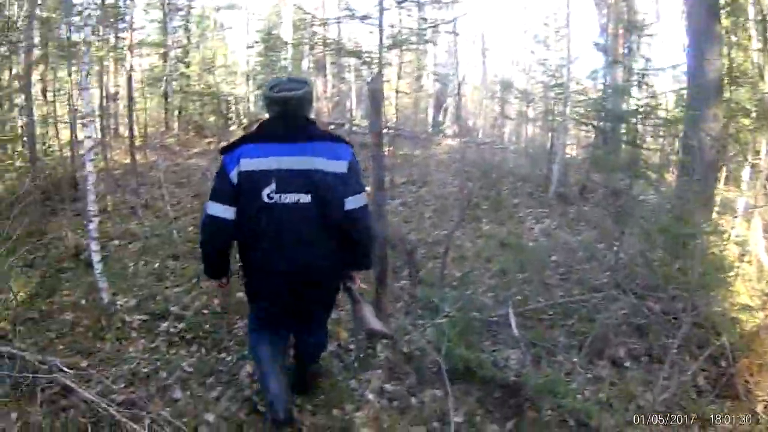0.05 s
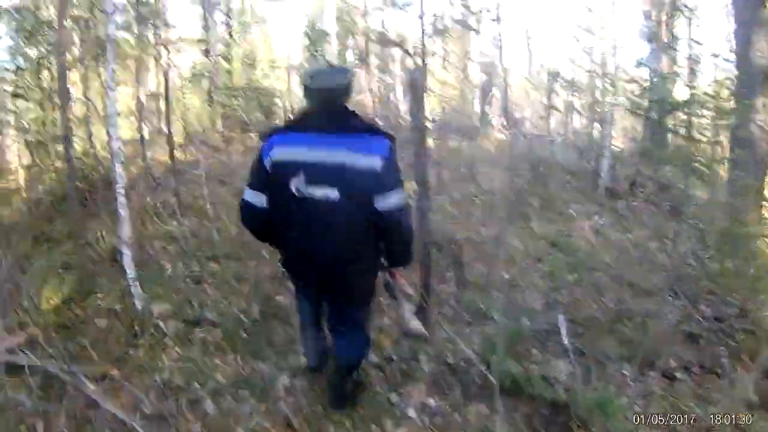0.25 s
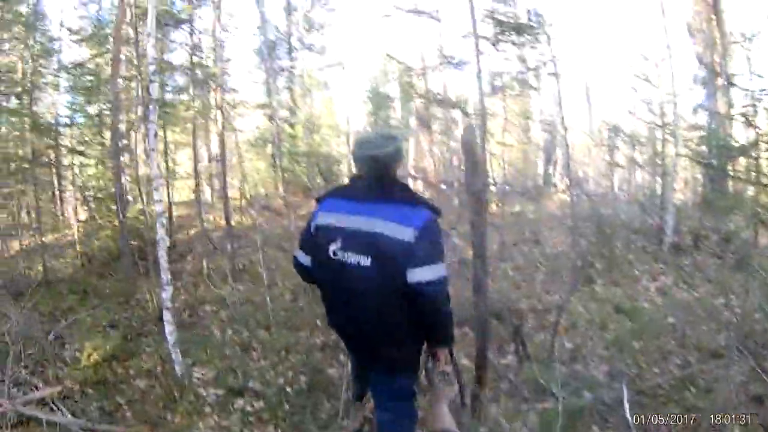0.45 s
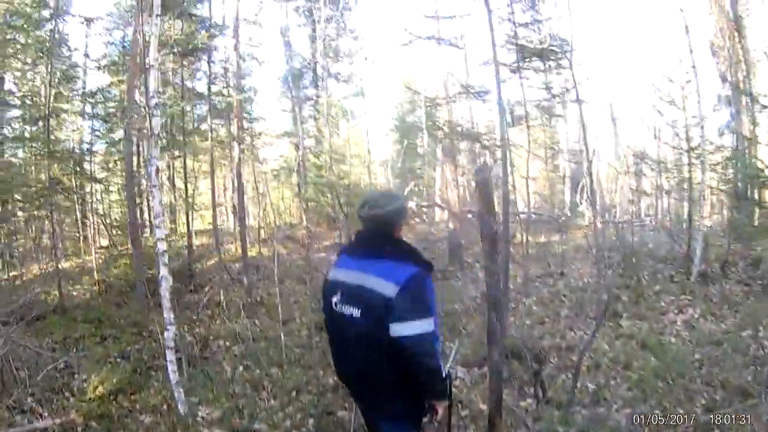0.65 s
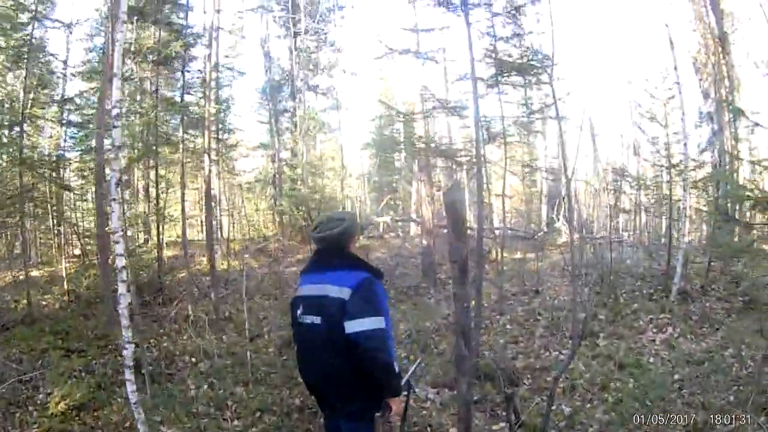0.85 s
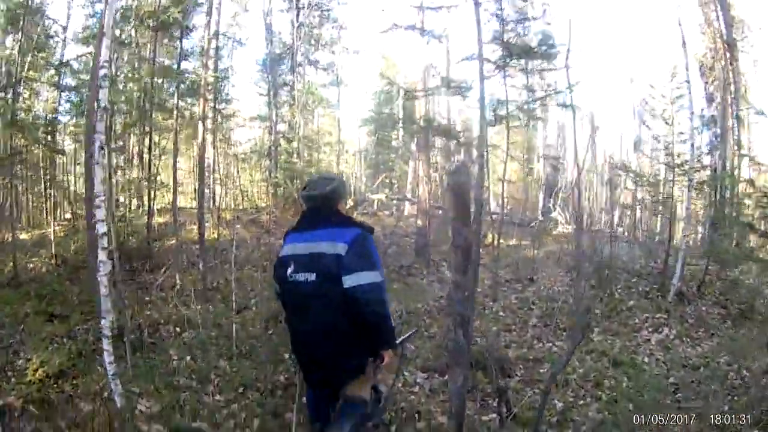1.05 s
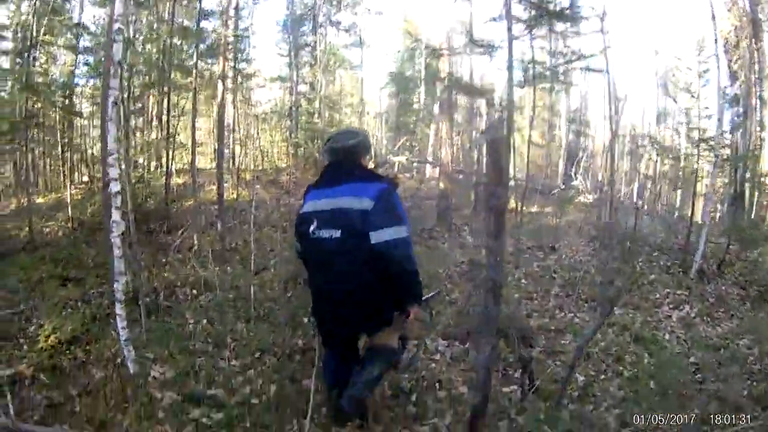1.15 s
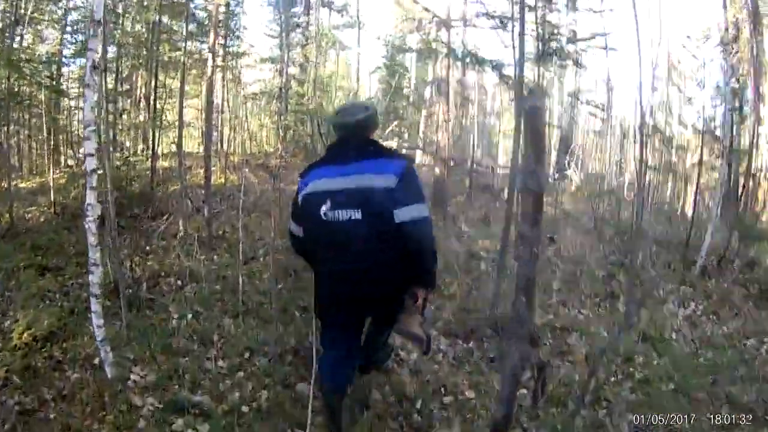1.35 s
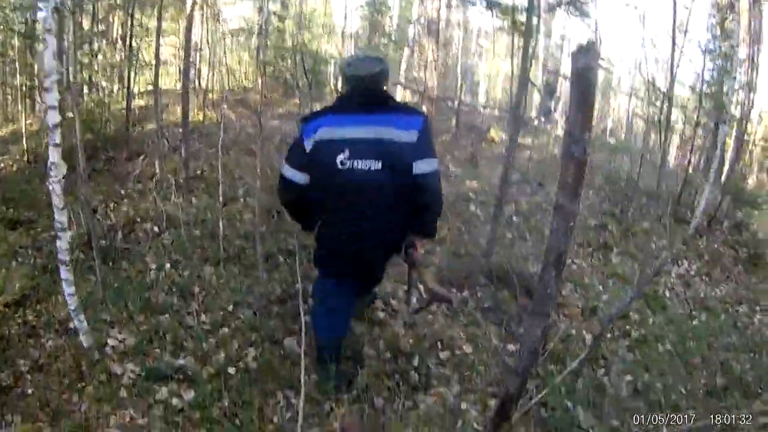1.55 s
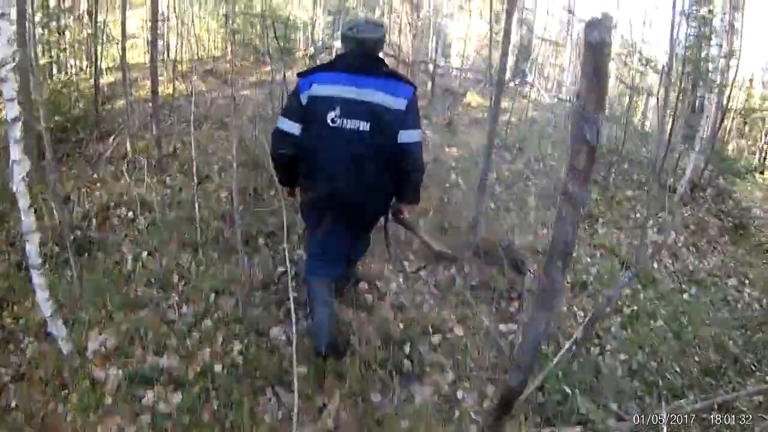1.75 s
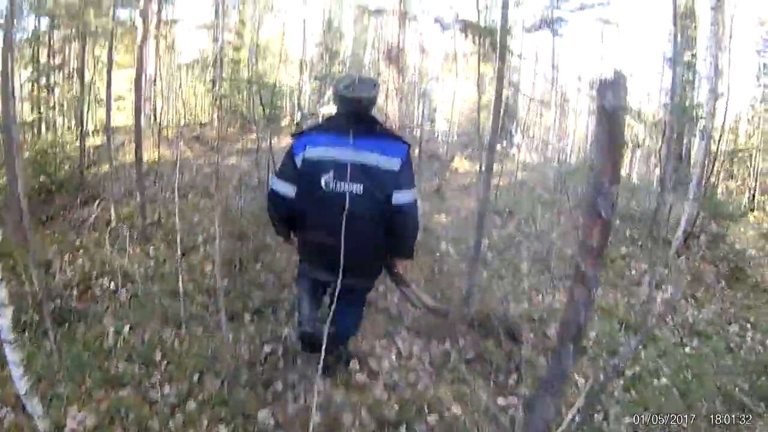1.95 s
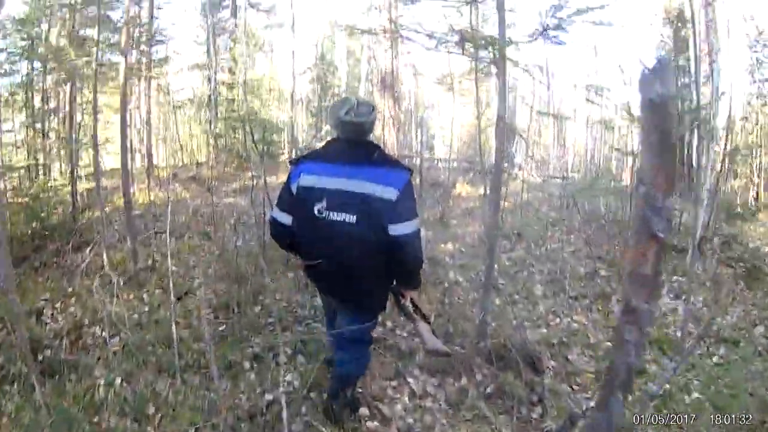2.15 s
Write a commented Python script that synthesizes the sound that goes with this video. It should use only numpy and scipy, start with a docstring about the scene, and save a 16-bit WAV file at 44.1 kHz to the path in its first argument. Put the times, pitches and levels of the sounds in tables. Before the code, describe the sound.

Someone walks through woodland, soft thudding steps rustling leaves and breaking small twigs.

```python
"""Slow footsteps thud on a soft forest floor, heard from close behind the walker.
Dry leaves crackle and crunch in tiny fractures, brush swishes past the legs, twigs snap and ring,
and there is one hollow knock. Under it all lie a faint hiss and a rumble of light wind
on the microphone, whose housing rings near 1.5 kHz."""
import sys
import numpy as np
from scipy import signal
from scipy.fft import rfft, irfft
from scipy.io import wavfile
from scipy.ndimage import uniform_filter1d

SR = 44100
rng = np.random.default_rng(int(sys.argv[2]) if len(sys.argv) > 2 else 0)


def waveform_to_disk(signal):
    """Save audio, clipped to [-1, 1], as 16-bit WAV at the path in sys.argv[1]."""
    frames = np.transpose(np.atleast_2d(signal))
    scaled = np.clip(frames, -1, 1) * 32767
    samples = np.round(scaled).astype(np.int16)
    wavfile.write(sys.argv[1], SR, samples)


N = 97020
T = np.arange(N) / SR


def undb(db):
    """Decibels to gain."""
    return 10 ** (np.asarray(db) / 20)


def unit(x):
    """Normalise to rms 1."""
    return x / np.sqrt(np.mean(x ** 2) + 1e-30)


def equalise(x, curve):
    """EQ through (f/Hz, gain/dB) points, rolling off below the first; normalised to rms 1."""
    hz, db = np.array(curve, float).T
    freqs = np.maximum(np.arange(N // 2 + 1) * SR / N, .1)
    gain = undb(np.interp(np.log(freqs), np.log(hz), db))
    low_cut = np.minimum(freqs / hz[0], 1) ** 2
    return unit(irfft(rfft(x) * gain * low_cut, N))


def resonate(x, hz, width):
    """A steep band-pass with make-up gain that holds the level of noise."""
    edges = np.clip([hz - width / 2, hz + width / 2], 5, SR * .45)
    band = signal.butter(2, edges, "band", fs=SR, output="sos")
    return signal.sosfilt(band, x) * np.sqrt(SR / 2 / width)


def drift(rate_hz):
    """A smooth random LFO at rms 1."""
    hold = int(SR / rate_hz)
    stepped = np.repeat(rng.standard_normal(N // hold + 1), hold)
    return unit(uniform_filter1d(uniform_filter1d(stepped, hold), hold)[:N])


def swell(at, rise, decay, crest_s=1e-4):
    """An envelope with a smooth attack and an exponential decay; crest_s rounds the peak."""
    before = np.minimum(T - at, 0)
    after = np.hypot(np.maximum(T - at, 0), crest_s) - crest_s
    return np.exp(-(before / rise) ** 2 - after / decay)


def ring(at, hz, decay):
    """One struck, damped mode."""
    age = np.maximum(T - at, 0)
    return np.sin(2 * np.pi * hz * age) * np.exp(-age / decay)


# EQ of the hiss and of the wind rumble: f/Hz, gain/dB
HISS_EQ = [(65, -12), (110, -3), (147, 0), (305, -4), (383, -6), (462, -5.5), (556, -6.5), (792, -8),
           (879, -12), (1230, -9), (1300, -9.5), (1540, -4.5), (1780, -12), (2190, -16.5), (2380, -18.5),
           (2640, -17.5), (3120, -20.5), (3390, -19), (3840, -21.5), (4730, -21), (7020, -26), (7960, -32),
           (9200, -26), (14800, -28.5), (15800, -29)]
WIND_EQ = [(10, -16.5), (22, -1), (32, -0.5), (50, -3), (65, -13), (90, -16), (130, -29.5), (250, -38.5),
           (1000, -78)]


def air(hiss_db=-64.5, waver_db=.62, wind_db=-55, gust_db=2):
    """The bed: faint woodland hiss and wind buffeting the microphone in light gusts."""
    hiss, wind = rng.standard_normal((2, N))
    hiss = equalise(hiss, HISS_EQ) * undb(hiss_db + waver_db * drift(rate_hz=7.47))
    wind = equalise(wind, WIND_EQ) * undb(wind_db + gust_db * drift(rate_hz=7.22))
    return hiss + wind


def rustle(swells, eq, floor=0, grains_per_s=4000, spread_db=2.6):
    """A granular texture of tiny leaf fractures, uneven in size, swelling with each movement."""
    sizes = undb(spread_db * np.minimum(rng.exponential(size=N), 5))
    grains = (rng.random(N) < grains_per_s / SR) * sizes * rng.choice([-1, 1], N)
    power = sum((undb(db) * swell(at, rise, decay)) ** 2 for at, db, rise, decay in swells)
    return equalise(grains, eq) * np.sqrt(power + floor ** 2)


# Flurries of crackle: peak t/s, level/dB, attack/s, decay/s
CRACKLES = [(.121, -67.5, 0.0063, 0.013), (.195, -72.5, .02, 0.082), (.41, -71.5, 0.023, .09),
            (.64, -72, 0.029, 0.074), (1.978, -60.5, 0.01, 0.021), (2.05, -65.5, .008, 0.012),
            (2.182, -65.5, 0.015, 0.025)]
# Their crisp EQ: f/Hz, gain/dB
CRACKLE_EQ = [(1000, 9), (2600, -5), (3800, 3), (5000, -7.5), (6300, -7.5), (8000, -16.5), (12000, -14),
              (16000, -24)]


def leaf_crackle():
    """Dry leaves crackle in flurries over a faint, steady floor of stray grains."""
    return rustle(CRACKLES, CRACKLE_EQ, floor=undb(-80))


# Passes through the brush: peak t/s, level/dB, attack/s, decay/s
SWISHES = [(.195, -62, 0.035, 0.0094), (.228, -58.5, 0.013, 0.033), (.406, -54.5, 0.028, 0.11),
           (.568, -56.5, 0.036, 0.039), (.611, -58, 0.01, 0.054), (.676, -60, 0.045, .04),
           (.84, -66, 0.042, 0.035), (1.203, -66, 0.013, 0.017), (1.35, -62.5, 0.038, 0.032),
           (1.465, -67.5, .008, 0.024), (1.654, -55.5, 0.009, 0.017), (2.12, -68, 0.015, 0.056),
           (2.186, -64, 0.019, .03)]
# Their mid-forward EQ, peaking at the housing's ring: f/Hz, gain/dB
SWISH_EQ = [(200, -22), (900, -7.5), (1230, -1), (1540, 9.5), (1800, -7), (2200, -13.5), (2800, -25),
            (3500, -16.5), (5000, -31), (8000, -50), (16000, -42)]


def brush_swish():
    """Brush slides past the legs in soft swells."""
    return rustle(SWISHES, SWISH_EQ)


# Snaps, the first being the firm attack of the first footfall: t/s, low band/dB, body band/dB, wood ring/dB, 4
# kHz band/dB, 6 kHz band/dB, 11 kHz band/dB
SNAPS = [(.2148, -47, -52, -68, -68, -76, -78), (.2722, -68, -56, -67, -56, -66, -72),
         (.5142, -66, -58, -66, -64, -62, -67), (.6072, -70, -49, -60, -63, -71, -64),
         (1.1795, -70, -36, -38, -44.5, -60, -53), (1.3558, -55, -47, -56, -50, -45.5, -55),
         (1.4915, -72, -55, -64, -59, -65, -58), (1.6625, -69, -44, -62, -53, -66, -53),
         (1.9326, -72, -64, -62, -55, -57, -74), (1.981, -48.5, -56, -62, -61, -62, -74),
         (2.0873, -45, -44.5, -62, -45, -56, -59)]
# The five bands of a crack: f/Hz, width/Hz, decay/s, delay/s
SNAP_BANDS = [(638, 536, 0.001, 0.000073), (1455, 470, 0.001, 0.00027), (3790, 1010, 0.00062, 0.0003),
              (6170, 1300, 0.00061, 0.000063), (11250, 4600, 0.00077, 0.00009)]
# Modes of the wood: f/Hz, level/dB, decay/s
WOOD_MODES = [(1910, -4.5, 0.0049), (2640, -15.5, .004), (3290, -13, 0.0024), (3900, -10, 0.0014),
              (4960, -22.5, 0.0055)]
# Microphone EQ on the snaps, a notch and a soft top: f/Hz, gain/dB
MIC_EQ = [(20, 3.5), (6900, -2.5), (7800, 0), (8500, -6), (9600, -3.5), (12500, 0), (13300, -9),
          (16000, -8)]


def twig_snaps(tail_db=-26.5, tail_s=.024, wood_trim_db=-1, wood_lag_s=.00109):
    """Fibres break in a burst of a few milliseconds; the wood rings on and the trees scatter a tail. The first
    row instead gives the first footfall its firm, low attack."""
    out, size = np.zeros(N + SR), SR // 10
    age = np.arange(size) / SR
    for at, low_db, body_db, wood_db, *treble_dbs in SNAPS:
        for db, (hz, width, decay, delay) in zip([low_db, body_db, *treble_dbs], SNAP_BANDS):
            fibres, scatter = rng.standard_normal((2, size))
            burst = fibres * age * np.exp(-age / decay)
            crack = unit(resonate(burst, hz, width)) * np.sqrt(decay / age[-1])
            tail = undb(tail_db) * resonate(scatter * np.exp(-age / tail_s), hz, width)
            start = int((at + delay) * SR)
            out[start:start + size] += undb(db) * (crack + tail)
        wood = sum(undb(db) * ring(at + wood_lag_s, hz, decay) for hz, db, decay in WOOD_MODES)
        out[:N] += undb(wood_db) * wood
    return equalise(out[:N], MIC_EQ) * np.std(out[:N])


# Crunches underfoot: peak t/s, level/dB, attack/s, decay/s
CRUNCHES = [(.2185, -51.5, .004, 0.018), (1.648, -59.5, 0.022, 0.01), (1.984, -56.5, 0.0085, 0.013),
            (2.10, -77, 0.004, 0.016), (2.19, -70, 0.019, .03)]
# Their dark, bass-heavy EQ: f/Hz, gain/dB
CRUNCH_EQ = [(100, 32), (300, 8.5), (800, 6), (1500, 8.5), (2200, -9), (4000, -33), (8000, -67),
             (16000, -34)]


def leaf_crunch():
    """A boot crushes leaves with a short, muffled crunch."""
    return rustle(CRUNCHES, CRUNCH_EQ)


# Steps and lighter shifts of weight: peak t/s, level/dB, f/Hz, attack/s, decay/s
STEPS = [(0.245, -19, 34.1, 0.029, 0.018), (.283, -25, 40.7, 0.025, 0.013),
         (.385, -46.5, 43.3, 0.028, 0.029), (0.848, -48, 37, 0.021, 0.058),
         (1.05, -30.5, 32.1, 0.02, 0.057), (1.124, -37.5, 43.3, 0.015, 0.015),
         (1.238, -41.5, 44, .015, 0.022), (1.87, -41, 37, 0.014, 0.0095), (1.926, -27, 32.4, 0.019, 0.016)]


def footfalls(glide_oct_per_s=3.3, grit_db=-19):
    """Each step shakes the soft ground for a few deep, rising cycles, roughened by low noise."""
    grit = undb(grit_db) * unit(resonate(rng.standard_normal(N), hz=55.6, width=27.7))
    out = np.zeros(N)
    for at, db, hz, rise, decay in STEPS:
        octaves = np.clip(glide_oct_per_s * (T - at), -1, 1)
        cycles = np.cumsum(hz * 2 ** octaves) / SR
        thud = -np.sin(2 * np.pi * (cycles - np.interp(at, T, cycles)))  # crosses zero at the peak
        out += undb(db) * swell(at, rise, decay, crest_s=.0055) * (thud + grit)
    return out


# The knock: t/s, level/dB, f/Hz, decay/s, thud level/dB
KNOCKS = [(0.5017, -37, 207.5, 0.007, -32.5)]


def knock(thud_hz=43, thud_decay_s=.014, lag_s=.0106):
    """A short hollow knock with a deep thud just behind it."""
    return sum(undb(db) * ring(at, hz, decay) + undb(thud_db) * ring(at + lag_s, thud_hz, thud_decay_s)
               for at, db, hz, decay, thud_db in KNOCKS)


def scene():
    """The mono mix: foliage, twigs and steps over the bed of air."""
    foliage = leaf_crunch() + brush_swish() + leaf_crackle()
    return (foliage + twig_snaps() + footfalls() + knock() + air())[None]


def record(dry, cutoff_hz=15850):
    """A steep low-pass takes off the top of the treble."""
    return signal.sosfilt(signal.ellip(10, .2, 70, cutoff_hz, fs=SR, output="sos"), dry)


dry = scene()
out = record(dry)
waveform_to_disk(out)
```